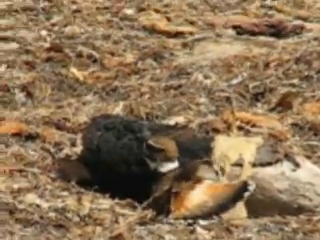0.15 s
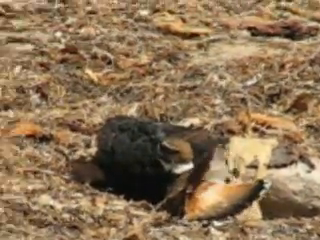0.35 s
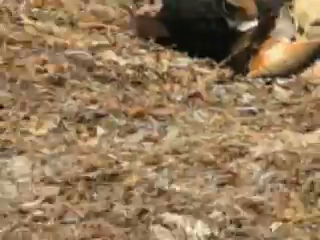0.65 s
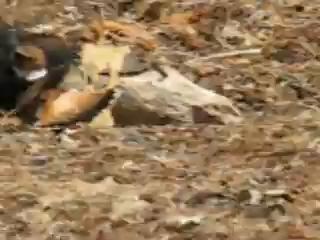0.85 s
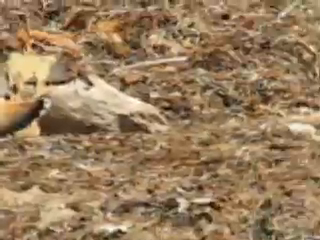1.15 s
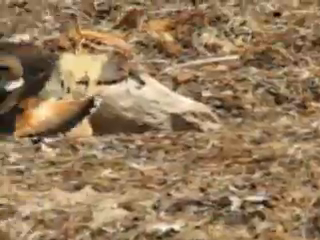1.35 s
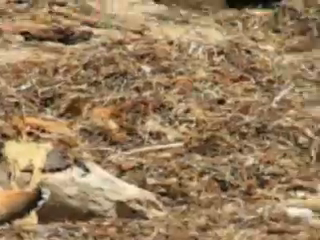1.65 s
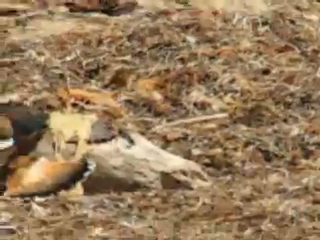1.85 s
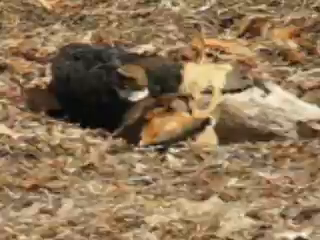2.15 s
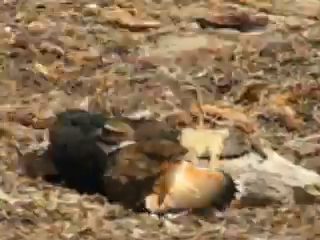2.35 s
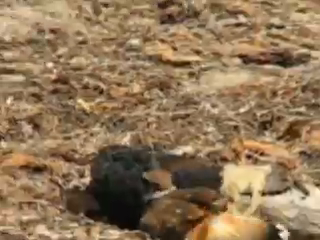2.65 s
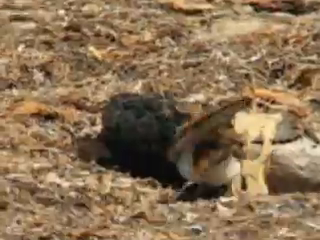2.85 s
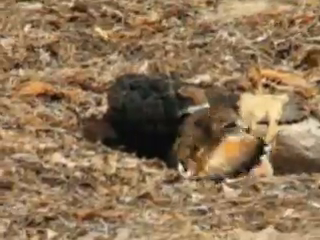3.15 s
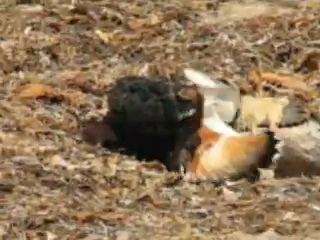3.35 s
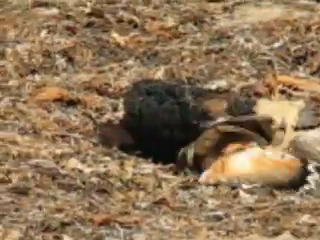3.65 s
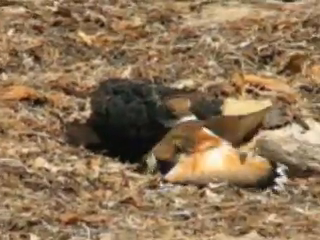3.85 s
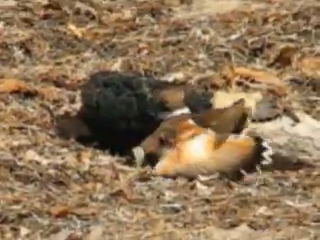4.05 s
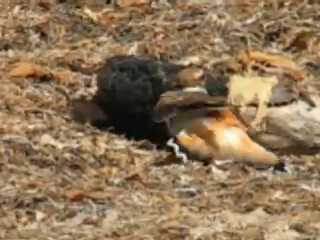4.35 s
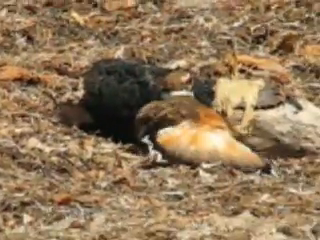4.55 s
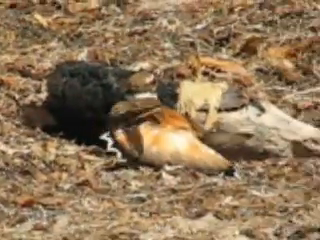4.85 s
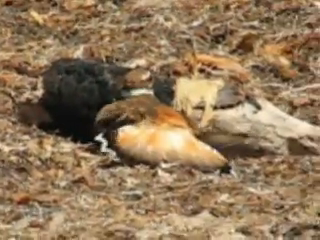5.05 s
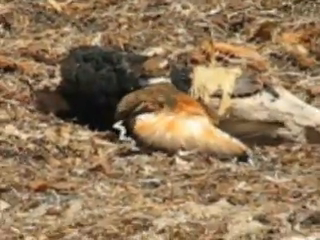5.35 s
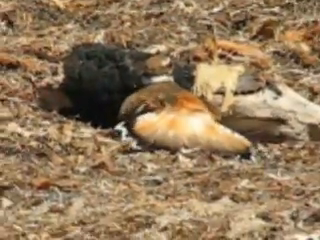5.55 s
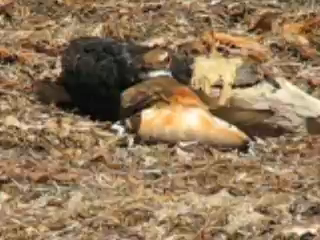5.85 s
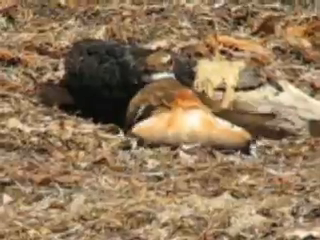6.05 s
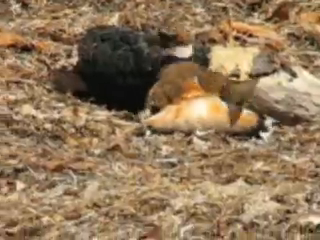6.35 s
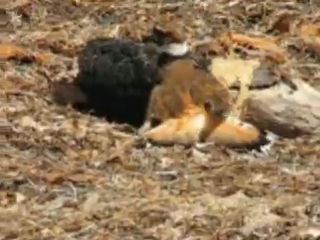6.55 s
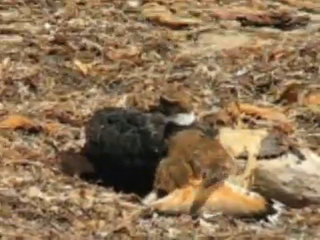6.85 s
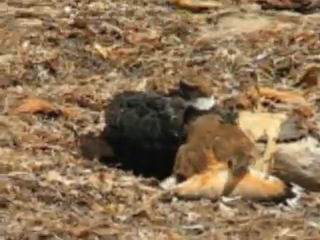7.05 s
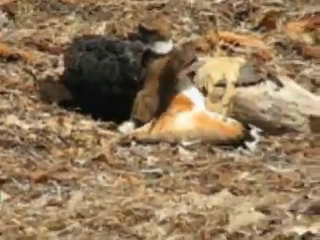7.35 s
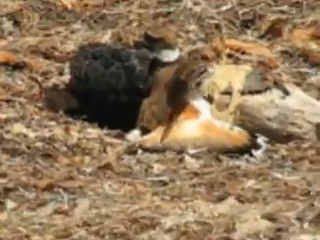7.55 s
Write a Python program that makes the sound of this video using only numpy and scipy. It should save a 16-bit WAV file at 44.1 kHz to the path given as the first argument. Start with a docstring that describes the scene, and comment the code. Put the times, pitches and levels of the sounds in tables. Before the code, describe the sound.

Outdoors in a light breeze, close to a handheld microphone, feet rustle dry mulch and twigs snap sharply. After a last crack, a bird gives faint rising whistles and a soft, very quick, echoing trill. It then pipes loudly, first in separate high notes, then in a rapid piercing run that stops near the end, leaving wind, leaves and hiss.

```python
"""Ground bird's alarm on dry mulch

A ground bird whistles, trills softly, then pipes loud and fast, near a hand-held camera in a light wind.
Its notes are near sines that slide in pitch; echoes of random taps trail them.
Feet scuff (shaped noise and crackle) and twigs snap (tiny fractures ringing wood modes), mostly at first.
Wind rumbles and leaves wash as shaped noise over circuit hiss; the camera whines faintly.
Coarse sampling adds a mirror image of the treble.
"""
import sys
import numpy as np
from scipy import signal
from scipy.fft import rfft, irfft, next_fast_len
from scipy.io import wavfile
from scipy.ndimage import uniform_filter1d

SR = 44100
rng = np.random.default_rng(int(sys.argv[2]) if len(sys.argv) > 2 else 0)


def transcribe(u):
    """Save the signal u as a 16-bit wav file named by the first command-line argument.

    u: samples, shape (n,) or (channels, n), limited to [-1, 1]; the rate is SR.
    q: integer samples, one column per channel.
    """
    v = np.clip(np.atleast_2d(u).T, -1, 1)
    q = np.round(v * 32767).astype(np.int16)
    wavfile.write(sys.argv[1], SR, q)


N = 339561  # length in samples


def gain_of(db):
    """Turns decibels into a plain multiplier."""
    return 10 ** (np.asarray(db) / 20)


def evened(x):
    """Scales a signal to an average strength (rms) of 1."""
    return x / np.sqrt(np.mean(x ** 2) + 1e-20)


def read(points, hz):
    """Reads levels between the points of a spectrum, on a log frequency axis."""
    f, value = np.transpose(points)
    return np.interp(np.log(hz + 1), np.log(f + 1), value)


def level_over_time(points):
    """Draws straight dB lines between (t/s, level/dB) points and returns the gain at each sample."""
    return gain_of(np.interp(np.arange(N) / SR, *np.transpose(points)))


def add(mix, s, sound):
    """Mixes a sound in at time s, cutting off what runs past the end."""
    part = mix[round(s * SR):][:len(sound)]
    part += sound[:len(part)]


def colour(x, points):
    """Filters a sound by a curve of (f/Hz, level/dB) points."""
    size = next_fast_len(N)
    gain = gain_of(read(points, np.fft.rfftfreq(size, 1 / SR)))
    return irfft(rfft(x, size) * gain, size)[:N]


def noise(points, patchy_db, size=512):
    """Noise of rms 1 from random short-time spectra, with louder and softer patches in time and pitch."""
    frames, hz = 4 * N // size + 5, np.fft.rfftfreq(size, 1 / SR)
    a, b, patches = rng.standard_normal((frames, len(hz), 3)).T
    patches = uniform_filter1d(patches, 8, 0)  # smooth across frequency
    patches = evened(uniform_filter1d(patches, 10, 1))  # smooth across time
    spectra = (a + 1j * b) * gain_of(read(points, hz)[:, None] + patchy_db * patches)
    sound = signal.istft(spectra, nperseg=size, noverlap=3 * size // 4)[1]
    return evened(sound[:N])


def whistle_tone(hz, strain, creak_db=-80):
    """A near sine; strain brings in the octave, half-order lines of uneven strokes and a creak a fourth up."""
    # tones added to the note: multiple of its pitch [1], typical level/dB before strain
    partials = [(2, -25), (.5, -29), (1.5, -23), (2.5, -32)]
    turns = 2 * np.pi * np.cumsum(hz) / SR  # phase in radians
    uneven_db = 3.5 * rng.standard_normal(len(partials))  # no two notes alike
    upper = sum(gain_of(db + odd_db) * np.sin(k * turns) for (k, db), odd_db in zip(partials, uneven_db))
    creak = gain_of(creak_db) * np.sin(4 / 3 * turns)
    rasp = 1 + .35 * evened(uniform_filter1d(rng.standard_normal(len(hz)), 40))
    return np.sin(turns) + strain * rasp * (upper + creak)


def pitch_break(t, u, length):
    """Starts a note flat, then jumps it sharp, an offset in Hz that fades by the nominal end."""
    break_s, below_hz, above_hz = .008, 50, 80
    jump = (t - break_s) / .0015  # 1.5 ms sets how quick the jump is
    offset_hz = np.where(jump < 0, below_hz, above_hz * (1 - u) / (1 - break_s / length))
    return offset_hz * np.tanh(jump)


def note(db, length, early_hz, late_hz, peak):
    """The membranes open abruptly near their rest pitch, slide to the note, swell to its peak and close."""
    rest_hz = 4380  # pitch of the membranes as they start to swing
    end = peak + (1 - peak) / .78  # the fade runs past the nominal length
    t = np.arange(0, end * length, 1 / SR)
    u = t / length  # place in the note, 1 = nominal end
    slide_hz = (late_hz - early_hz) * (u - .2) / 0.63
    start_hz = 1.3 * (rest_hz - early_hz) * np.exp(-u / 0.06)
    hz = early_hz + slide_hz + start_hz
    long_and_hard = length > .022 and db > -12  # s, dB
    hz = hz + long_and_hard * pitch_break(t, u, length)

    opening = np.sin(np.pi / 2 * np.minimum(t / 0.0013, 1)) ** 2  # takes 1.3 ms
    swell = 0.74 + 0.42 * np.sin(np.pi / 2 * np.minimum(u / peak, 1))
    closing = np.cos(np.pi / 2 * np.clip((u - peak) / (end - peak), 0, 1)) ** 1.3

    strain = np.abs(np.sin(np.pi * u / end)) ** 1.2
    strain = strain * gain_of(0 if long_and_hard else -.8 * max(db + 11, 0))  # other hard notes ring purer
    creak_db = -17 + 8 * min(db + 4.5, 0)  # only the hardest notes creak noticeably
    return gain_of(db) * opening * swell * closing * whistle_tone(hz, strain, creak_db)


def piping():
    """Loud notes, each sliding between two pitches; longer notes peak later."""
    # loud notes: t/s, level before the swell/dB, nominal length/s, early f/Hz, late f/Hz
    pipes = [(3.7094, -16.6, 0.0251, 4423, 4417), (3.8989, -9.9, 0.0333, 4450, 4402),
             (4.0103, -6.5, 0.0333, 4552, 4460), (4.1064, -7.1, 0.0244, 4440, 4387),
             (4.2031, -7.3, 0.0252, 4346, 4423), (4.3688, -14.8, 0.0201, 4305, 4224),
             (4.4579, -12.4, 0.018, 4178, 4160), (4.507, -13.6, 0.016, 4127, 4135),
             (4.5563, -10.3, 0.0159, 4218, 4138), (4.6068, -8.6, 0.0149, 4260, 4155),
             (4.6609, -8.7, 0.0156, 4174, 4073), (4.7117, -6.9, 0.0185, 4226, 4270),
             (4.768, -4.9, 0.02, 4268, 4303), (4.8307, -4.0, 0.0201, 4339, 4280),
             (4.8849, -5.7, 0.0172, 4214, 4201), (4.9333, -10.0, 0.0144, 4055, 3987),
             (4.9774, -9.6, 0.0152, 4023, 3917), (5.0192, -10.0, 0.0128, 4009, 3797),
             (5.0659, -14.2, 0.0149, 3750, 3753), (5.108, -10.5, 0.0123, 3974, 3790),
             (5.1508, -10.1, 0.0126, 4017, 3863), (5.1983, -12.1, 0.017, 3959, 3925),
             (5.2485, -10.7, 0.0163, 4024, 3904), (5.2962, -10.4, 0.0144, 4076, 3855),
             (5.3381, -9.8, 0.014, 4139, 3830), (5.3841, -12.9, 0.0146, 3871, 3779),
             (5.4359, -9.2, 0.0177, 4109, 4078), (5.4849, -13.2, 0.0175, 3917, 3772),
             (5.5278, -8.8, 0.015, 4208, 3920), (5.5774, -11.4, 0.0173, 3993, 3858),
             (5.6246, -13.1, 0.0151, 3868, 3742), (5.666, -10.7, 0.0148, 3984, 3716),
             (5.7131, -13.1, 0.014, 3818, 3699), (5.758, -11.3, 0.0137, 3880, 3722),
             (5.8078, -8.4, 0.0162, 3979, 3819), (5.8563, -9.6, 0.0163, 3930, 3768),
             (5.9032, -9.4, 0.0168, 3918, 3772), (5.9503, -9.1, 0.0155, 3934, 3769),
             (6.0014, -13.9, 0.0179, 3799, 3737)]
    loud = np.zeros(N)
    for s, db, length, early_hz, late_hz in pipes:
        peak = np.clip(.26 + 70 * (length - .015), .11, .45)  # place of the peak, 0-1
        add(loud, s - .0007, note(db, length, early_hz, late_hz, peak))
    return loud


def soft_trill():
    """Quick soft notes, most falling in pitch; the beat starts slow, settles, then slackens note by note."""
    # effort and pitch along the trill: t/s, level before the swell and note-to-note spread/dB, middle f/Hz
    trill = [(1.97, -32, 4480), (2.1, -28, 3950), (2.2, -30, 3910), (2.3, -33, 3860), (2.43, -31, 3920),
             (2.64, -32, 3950), (2.74, -27.5, 3990), (3.09, -23.5, 3940), (3.3, -23, 3900),
             (3.4, -28.5, 3960), (3.52, -23, 3900), (3.66, -26.5, 3920)]
    notes, start_s, beat_s, slack_s = 47, 1.997, .033956, .0000386
    run_up_s, run_up_notes, last_s = .02, 1.3, .01  # slow start; delay of the last note
    trilled = np.zeros(N)
    k, (at, effort_db, pitch_hz) = np.arange(notes), np.transpose(trill)
    beats = start_s + beat_s * k + slack_s * k ** 2
    beats = beats - run_up_s * np.exp(-k / run_up_notes) + last_s * (k == notes - 1)
    for s, (lift, droop, stretch, push) in zip(beats, rng.standard_normal((notes, 4))):
        db = np.interp(s, at, effort_db) + push
        hz = np.interp(s, at, pitch_hz) + 30 * lift
        fall_hz = 139 + 6 * (db + 19.0) + 45 * droop  # harder notes sweep further
        length = 0.014 + 0.0013 * stretch
        add(trilled, s - .001, note(db, length, hz + fall_hz, hz - fall_hz, 0.15))
    return trilled


def opening_whistles():
    """Each whistle swells and bends up at its end."""
    # whistles: t/s, length/s, level before the swell/dB, starting f/Hz
    whistles = [(1.786, 0.056, -35, 4500), (1.855, .03, -44, 4520), (1.908, 0.035, -26.5, 4560)]
    upturn_hz, swell_db, edge_s = 250, 8.5, .005
    whistled = np.zeros(N)
    for s, length, db, hz in whistles:
        t = np.arange(0, length, 1 / SR)
        edges = np.clip(np.minimum(t, length - t) / edge_s, 0, 1)
        level = gain_of(db + swell_db * (t / length - 1.5)) * edges
        bent_hz = hz + upturn_hz * (t / length) ** 4
        add(whistled, s, np.sqrt(2) * level * whistle_tone(bent_hz, 0.85))
    return whistled


def field(x, t60, first_s, share):
    """Scattered echoes off ground and bushes: sparse taps of random sign, dying away."""
    at = np.arange(0, SR, 20) + rng.integers(0, 20, SR // 20)
    sign, there = rng.random((2, len(at)))
    fading = gain_of(-60 * at / SR / t60)
    build_up = 1 - np.exp(-at / SR / first_s)
    taps = np.zeros(SR + 20)
    taps[at] = np.sign(sign - .5) * (there < share) * fading * build_up
    return signal.fftconvolve(x, taps / np.linalg.norm(taps))[:N]


def bird():
    """Loud notes face the camera; whistles and soft trill are turned away, so they carry more echo."""
    loud = piping()
    soft = soft_trill() + opening_whistles()
    near = colour(loud + soft, [(9600, -2.0), (10600, -22.0)])  # the throat passes little of the very top
    far_echoes = gain_of(-25) * field(loud, .5, .05, .06)
    return near + far_echoes + gain_of(-8.5) * field(soft, 0.82, 0.0022, 0.25)


def snaps():
    """Tiny fractures ring the wood: top modes die soonest, those near 1 kHz last longest, over a low thump."""
    # twig snaps: t/s, body peak level/dB, crack peak level/dB (both before the group's own level)
    snap_list = [(0.356, -19, -9.5), (.392, -34, -21), (0.4038, -47, 0), (0.4086, -34, -6.5),
                 (0.4335, -12, -35), (0.4455, -42, -7), (.468, -23, -20), (.613, -20.5, -40),
                 (0.627, -41, -20), (0.756, -19, -12), (0.7628, -15.5, -16), (1.014, -34, -18.5),
                 (1.0766, -19, -32), (1.184, -11, -15), (1.3666, -32, -12.5), (1.9316, -12, -2.5)]
    # groups of wood modes: rise/s, time to fall 60 dB/s, low f/Hz, high f/Hz, share of crack [0-1], level/dB
    wood = [(0.001, 0.013, 380, 760, 0, -6), (0.0033, 0.039, 900, 1037, 0.03, -5),
            (0.00039, 0.031, 1260, 2520, 0, 0.5), (0.00039, 0.011, 2750, 5900, 0.37, 1),
            (0.000011, 0.0054, 6100, 10030, 0.86, -4)]
    out, t = np.zeros(N), np.arange(2600) / SR
    for s, body_db, crack_db in snap_list:
        fractures = rng.standard_normal(200) ** 3 * np.exp(-np.arange(200) / SR / 0.0015)
        places = (np.arange(10) + rng.random((len(wood), 10))) / 10  # every twig has its own modes
        for (rise, t60, lo_hz, hi_hz, share, db), place in zip(wood, places):
            mode_hz = lo_hz * (hi_hz / lo_hz) ** place[:, None]
            modes = np.sin(2 * np.pi * mode_hz * t + 40 * place[:, None]).sum(0)
            shape = (1 - np.exp(-(t / rise) ** 2)) * gain_of(-60 * t / t60)
            ring = signal.fftconvolve(fractures, modes * shape)
            peak_db = db + body_db + share * (crack_db - body_db)
            add(out, s, gain_of(peak_db) * ring / abs(ring).max())
    return out


def feet():
    """Mulch rustles under foot as patchy noise; fine dry crackle of random grains rides on top."""
    # scuffing, before the final fade: t/s, level/dB
    scuff = [(0, -34), (.31, -34.5), (.42, -29), (.6, -34.5), (1.14, -34.5), (1.4, -40), (2.1, -43)]
    # spectrum of the mulch: f/Hz, relative level/dB
    litter = [(150, -30), (300, -2), (1000, -2), (2000, -3), (2150, -18), (3600, -19), (4200, -40)]
    # dry litter brushed aside: t/s, peak crackle level before the final fade/dB
    brushes = [(.36, -34.5), (.445, -34), (.62, -36.5), (0.761, -36), (1.03, -44.5), (1.78, -42),
               (1.94, -40)]
    rise_s, fall_s = 0.026, 0.023  # of each brush stroke
    shuffle_db, still_db = -47, -69
    t = np.arange(N) / SR
    fade = np.clip((2.15 - t) / 0.19, 0, 1)  # silent after 2.15 s
    sizes = gain_of(0.93 * np.minimum(rng.exponential(1, N), 5))
    grains = sizes * (rng.random(N) < 4000 / SR) * rng.choice([-1, 1], N)  # about 4000 per second
    crackle = evened(colour(grains, [(1800, -11), (3000, -10), (6000, -5), (11000, -9)]))
    body = level_over_time(scuff) * noise(litter, 1.6)
    steady = np.where((t > .3) & (t < 1.4), gain_of(shuffle_db), gain_of(still_db))
    strokes = sum(gain_of(db) * np.exp(np.minimum((t - s) / rise_s, (s - t) / fall_s)) for s, db in brushes)
    return fade * (body + (uniform_filter1d(steady, 2000) + strokes) * crackle)


def gusts():
    """Wind thumps on the microphone: low patchy noise that rises and falls."""
    # gust rumble: t/s, level/dB
    gust_levels = [(0, -34.5), (1.05, -32.5), (1.2, -26), (1.68, -35), (1.88, -29.5), (2.2, -35),
                   (2.95, -29), (3.46, -34.5), (3.7, -27.5), (3.9, -31.5), (4.6, -31), (5.48, -35.5),
                   (6.2, -37), (6.42, -29.5), (6.54, -39), (6.88, -34), (7.16, -35), (7.7, -31.5)]
    # spectrum of the rumble: f/Hz, relative level/dB
    rumble = [(15, -28), (30, -4.5), (62, -1), (110, -4), (300, -13), (500, -31.5), (900, -84)]
    return level_over_time(gust_levels) * noise(rumble, 1.32, size=2048)


def air():
    """The far wash of leaves over steady circuit hiss, both patchy noise."""
    # leaf wash: t/s, level/dB
    wash_levels = [(0, -38.5), (1.8, -36.5), (2.999, -34.5), (6, -35.5), (6.5, -33.5)]
    # spectrum of the leaves: f/Hz, relative level/dB
    leaves = [(88, -33), (150, 0.5), (221, -13.5), (259, -6.5), (295, -5), (1360, -13), (3340, -14.5),
              (7000, -32), (9100, -37.5), (15400, -120)]
    # spectrum of the hiss: f/Hz, relative level/dB
    hiss = [(2650, -31), (4500, 0), (7180, -10.5), (7800, -2.5), (8000, 0), (8430, -2), (9330, -16.5),
            (11000, -14.5), (14300, -74), (22000, -120)]
    hiss_db = -48.5
    wash = level_over_time(wash_levels) * noise(leaves, 0.94)
    return wash + gain_of(hiss_db) * noise(hiss, 1.6)


def camera():
    """A thin steady-pitched whine that is faint at first, grows after a moment and flickers in level."""
    whine_hz, full_db = 8280, -54
    t = np.arange(N) / SR
    waver = uniform_filter1d(rng.standard_normal(N), 1500)
    waver = evened(uniform_filter1d(waver, 600))
    flicker_db = 14 * np.clip(waver + .1, -1, 0) - 10 * (t < 1.36)  # 10 dB fainter before 1.36 s
    return np.sqrt(2) * gain_of(full_db + flicker_db) * np.sin(2 * np.pi * whine_hz * t)


def scene():
    """Nearly mono; only the hiss and rustle of the treble differ between left and right."""
    # level of the left-right difference: f/Hz, level/dB
    apart = [(5700, -66), (6200, -3), (9000, -1.5), (11000, 0.5)]
    mid = bird() + snaps() + gusts() + air() + feet() + camera()
    side = colour(air() + feet(), apart)  # fresh random draws
    return np.array([mid + side, mid - side])


def record(dry):
    """Coarse sampling mirrors the treble about half the clock; then the band limit."""
    # level of the mirrored treble: f/Hz, level/dB
    mirror = [(11100, 1), (13000, -4.5), (14200, -2.5), (14700, -34), (15300, -59)]
    clock_hz, edge_hz = 22077, 15500
    kept = signal.oaconvolve(dry, signal.firwin(1023, clock_hz / 2, fs=SR)[None], "same")
    analytic = signal.hilbert(kept, next_fast_len(N))[:, :N]
    clock = np.exp(2j * np.pi * clock_hz * np.arange(N) / SR)
    flipped = (analytic.conj() * clock).real  # f goes to clock - f
    wide = kept + [colour(x, [(clock_hz / 2 - 40, -120)] + mirror) for x in flipped]
    band_limit = signal.firwin(511, edge_hz, window=("kaiser", 9), fs=SR)
    return signal.oaconvolve(wide, band_limit[None], "same")


dry = scene()
out = record(dry)
transcribe(out)
```